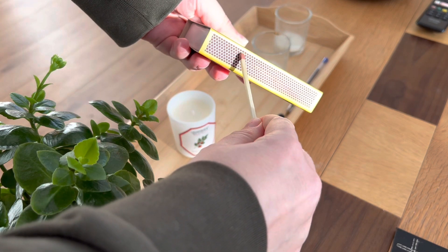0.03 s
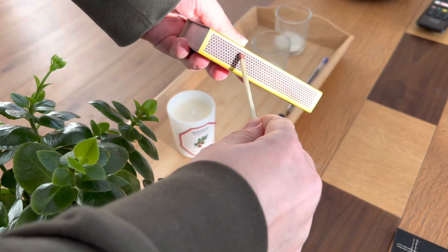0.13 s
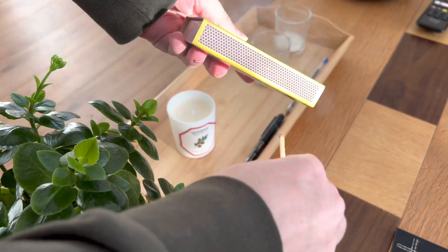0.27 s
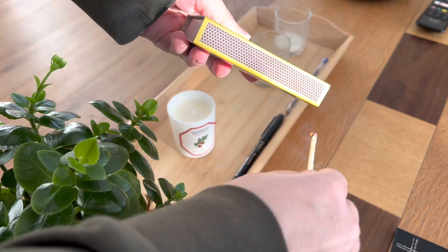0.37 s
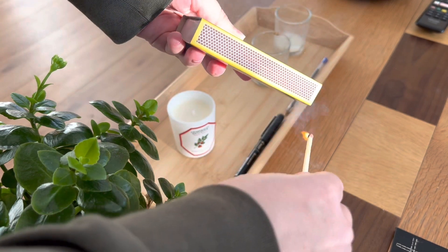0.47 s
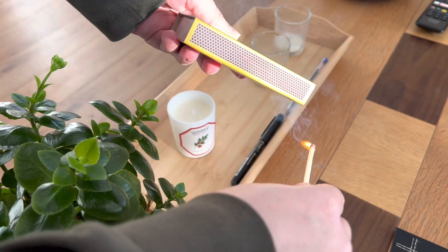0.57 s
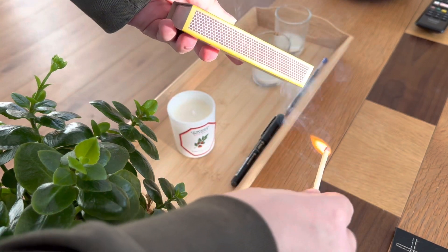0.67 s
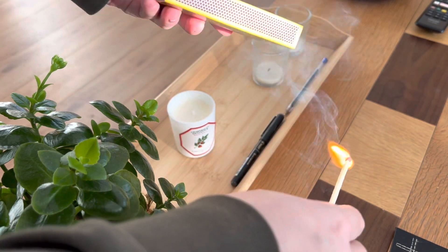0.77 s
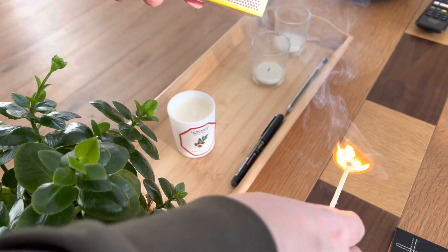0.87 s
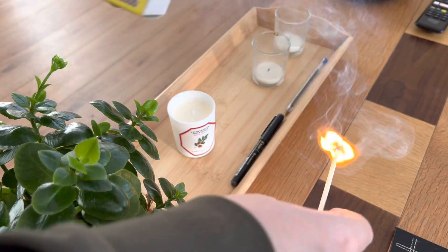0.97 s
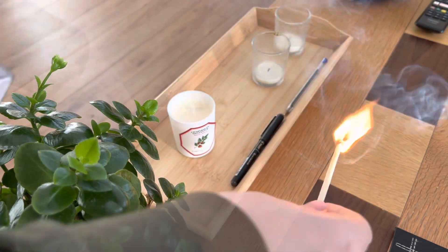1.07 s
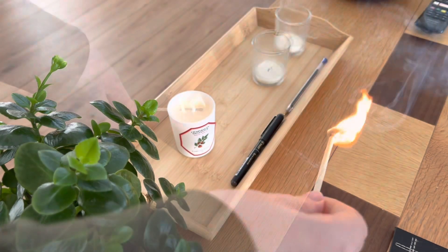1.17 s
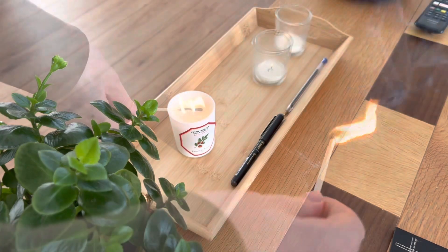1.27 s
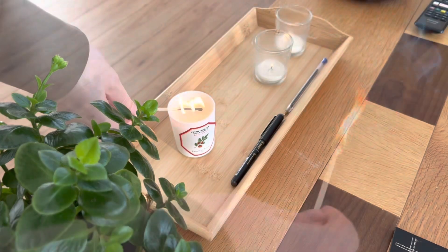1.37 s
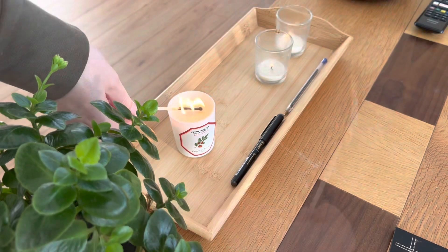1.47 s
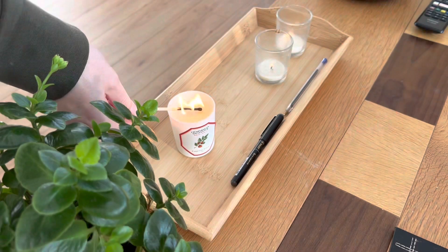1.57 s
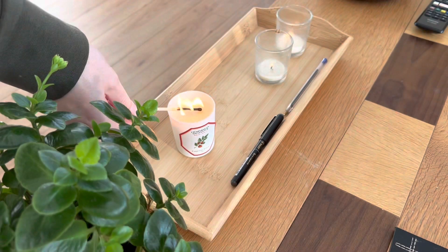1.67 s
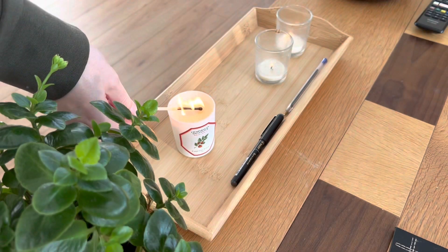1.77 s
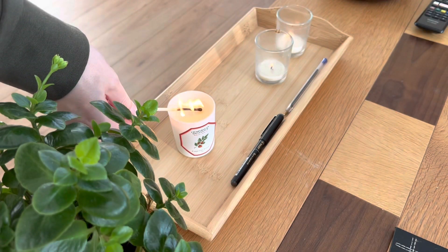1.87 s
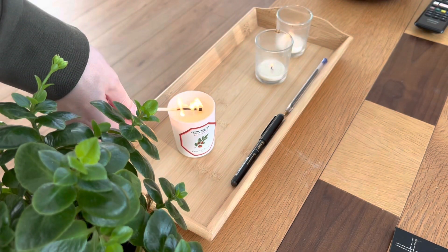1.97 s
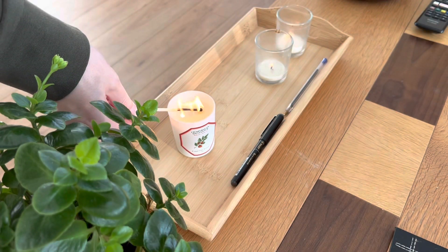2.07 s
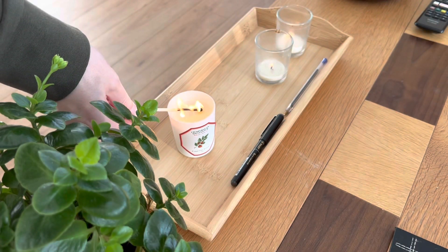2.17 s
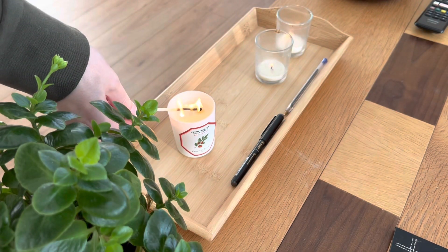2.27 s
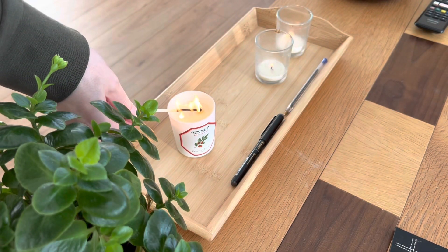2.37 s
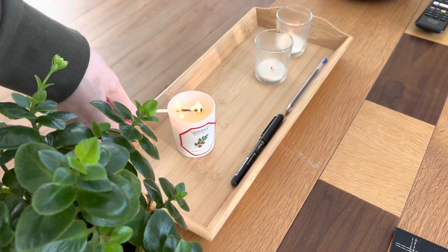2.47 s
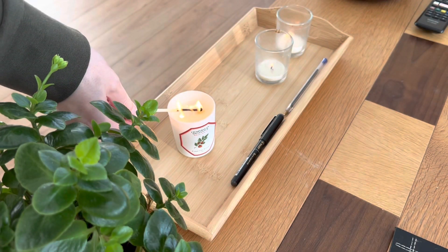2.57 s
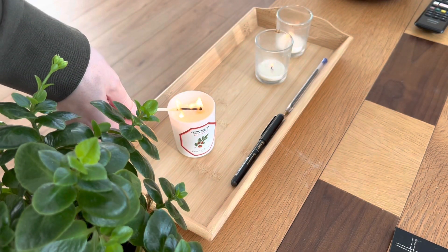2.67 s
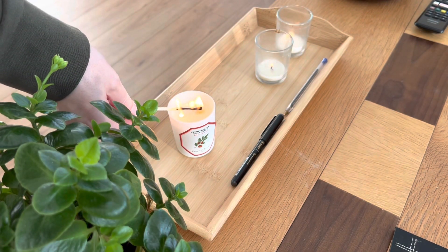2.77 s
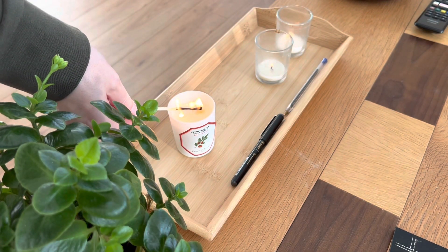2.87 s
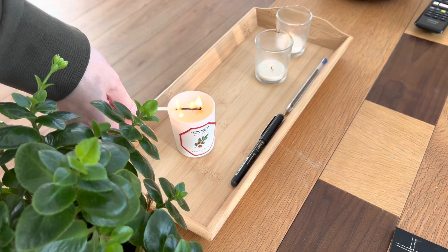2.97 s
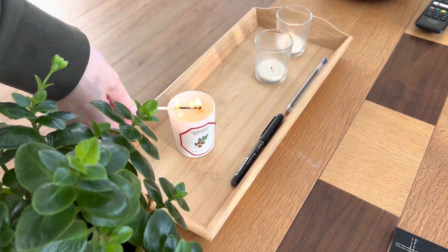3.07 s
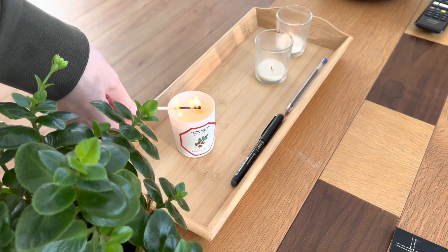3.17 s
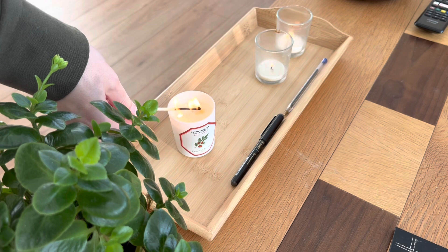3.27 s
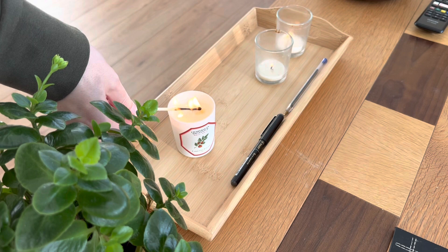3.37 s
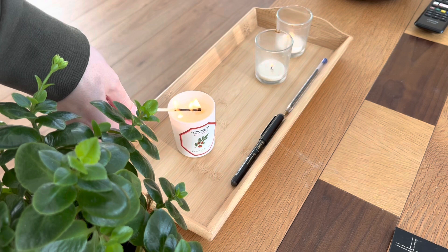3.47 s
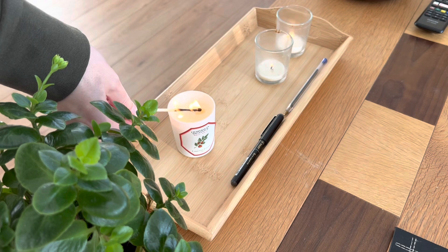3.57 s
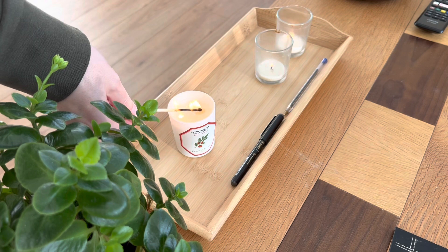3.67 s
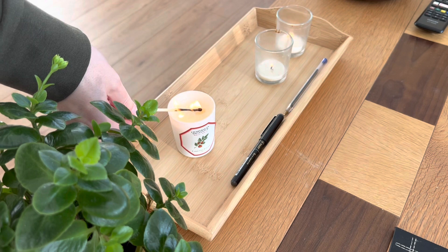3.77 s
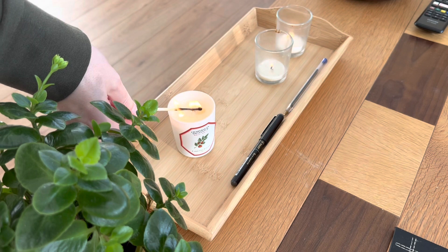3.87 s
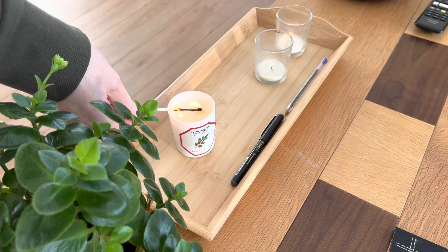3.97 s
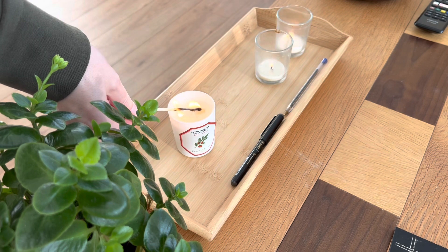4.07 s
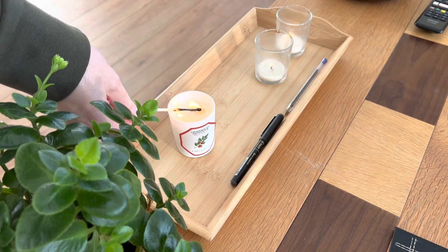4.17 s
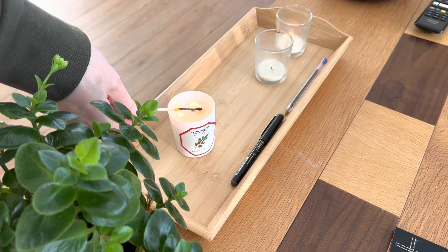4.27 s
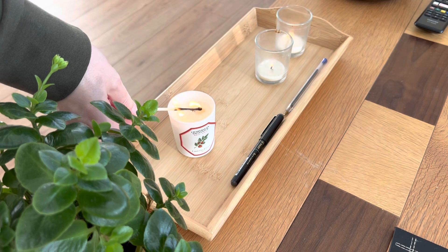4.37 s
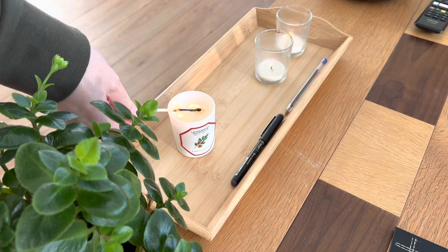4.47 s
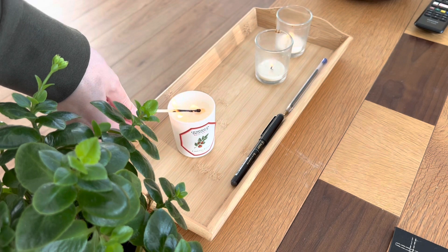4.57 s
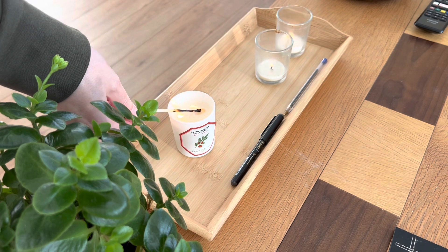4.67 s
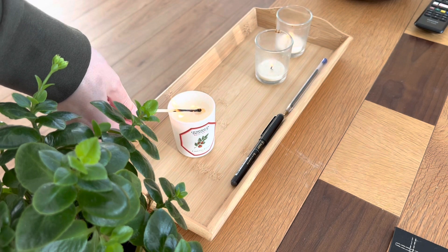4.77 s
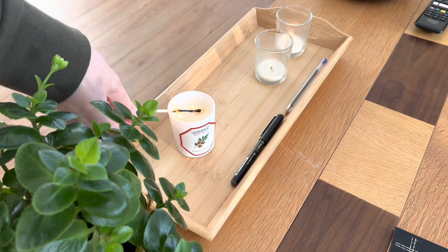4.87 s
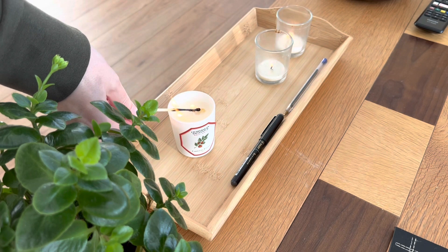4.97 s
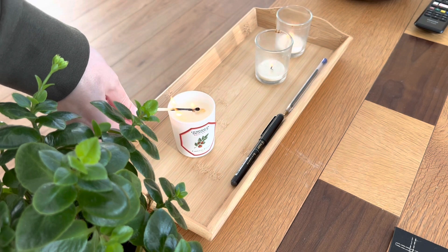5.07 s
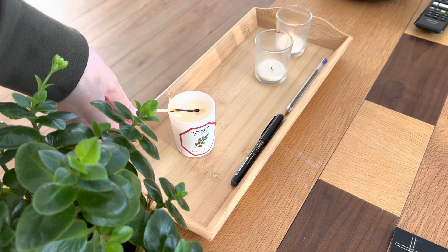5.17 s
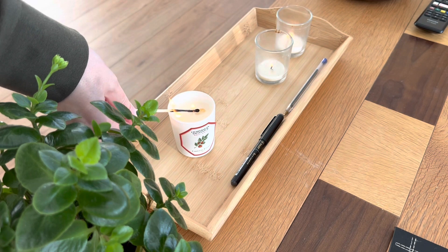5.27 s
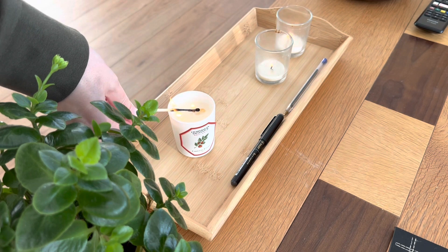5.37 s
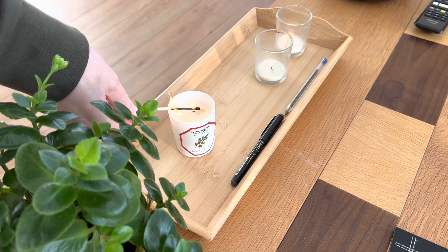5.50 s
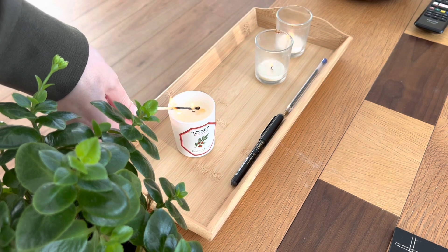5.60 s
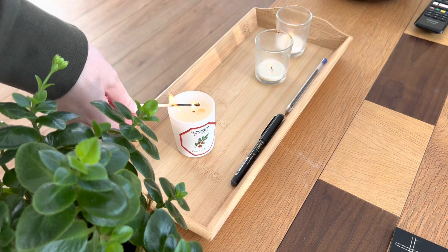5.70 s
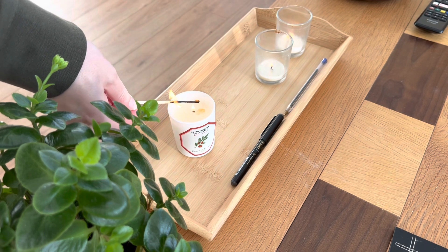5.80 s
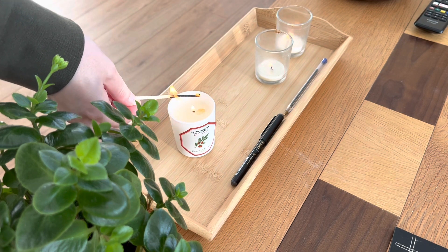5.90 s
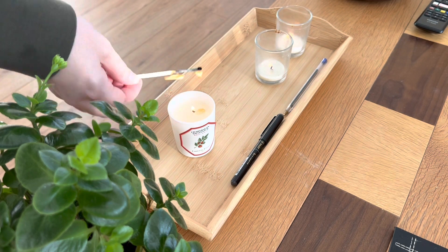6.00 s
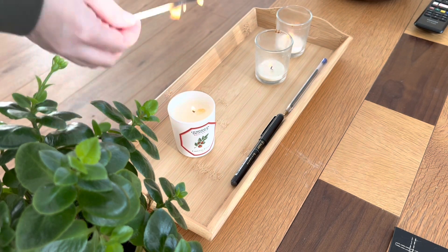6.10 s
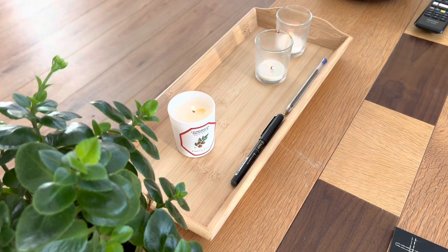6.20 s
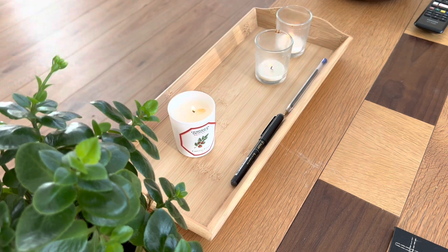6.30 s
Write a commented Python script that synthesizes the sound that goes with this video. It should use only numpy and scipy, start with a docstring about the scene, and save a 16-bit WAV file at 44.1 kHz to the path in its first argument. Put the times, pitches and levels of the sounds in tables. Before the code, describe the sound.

A wooden match is scraped once on a matchbox, flares with a fluttering hiss that stops short, then faint crackles tick in a quiet room.

```python
"""Small, quiet room, two closely spaced microphones: a low swelling rumble of noise lies under still air.
Close by, a wooden match is scraped once along a matchbox: grit and slips are impacts that ring the hollow box.
The head flares, a hiss of countless tiny grains over a low noise roar; it fades, surges and stops short.
Held to a candle in a glass, wood and wick then tick in damped pops and bursts, over a faint fizz of grains.
The fizz rises near the end as the match is drawn out; the room answers with a short tail of reflections."""
import sys
import numpy as np
from scipy import signal
from scipy.fft import rfft, irfft, next_fast_len
from scipy.io import wavfile
from scipy.ndimage import uniform_filter1d

SR = 44100
rng = np.random.default_rng(int(sys.argv[2]) if len(sys.argv) > 2 else 0)


def generate_wav(signal):
    """Clip the signal to [-1, 1] and save it as 16-bit WAV at the path in sys.argv[1]."""
    frames = np.transpose(np.atleast_2d(signal))
    scaled = np.clip(frames, -1, 1) * 32767
    pcm = np.round(scaled).astype(np.int16)
    wavfile.write(sys.argv[1], SR, pcm)


N = 279594
TIME, FREQS = np.arange(N) / SR, np.fft.rfftfreq(N, 1 / SR)  # s, Hz
CATCH_S, CUT_S = 0.28, 1.38  # the head takes fire, and the flare's sound is cut off


def amp(db):
    """Decibels to gain."""
    return 10 ** (np.asarray(db) / 20)


def unit(x):
    """Scales to an rms of one."""
    return x / np.sqrt(np.mean(x ** 2) + 1e-30)


def at_hz(points, hz):
    """Reads a table along a logarithmic frequency axis."""
    f, value = np.transpose(points)
    return np.interp(np.log(hz + 1), np.log(f + 1), value)


def colour(x, points):
    """Gives a sound a spectrum, at an rms of one."""
    return unit(irfft(rfft(x) * amp(at_hz(points, FREQS)), N))


def band_noise(low_hz, high_hz, length):
    """Noise between two frequencies."""
    sos = signal.butter(2, [low_hz, high_hz], "band", fs=SR, output="sos")
    return signal.sosfilt(sos, rng.standard_normal(length))


def add(mix, s, sound):
    """Lays a short sound into a track, starting at s seconds."""
    part = mix[max(round(s * SR), 0):][:len(sound)]
    part += sound[:len(part)]


def flutter(size):
    """Random wavering, smooth over this many samples."""
    return unit(uniform_filter1d(rng.standard_normal(N), size=size))


def grains(per_s, spread_db):
    """Random tiny impacts, mostly small, a few large."""
    size = amp(spread_db * np.minimum(rng.exponential(1, N), 3.5))
    hits = rng.choice([-1, 1], N) * (rng.random(N) < per_s / SR)
    return unit(size * hits)


def burst(decay_s):
    """A spike of noise that dies at once, with the energy of one millisecond at unit power."""
    t = TIME[:SR // 50]
    x = rng.choice([-1, 1], len(t)) * np.exp(-t / decay_s)
    return x * np.sqrt(SR / 1000) / np.linalg.norm(x)


def pop(hz, cycles):
    """A heavily damped ring that swells within its first cycle."""
    turns = hz * TIME[:SR // 20]
    return np.sin(2 * np.pi * turns) * np.exp(-turns / cycles) * (1 - np.exp(-2 * np.pi * turns))


# How alike the two microphones hear sound from all sides.
# Each row: frequency in Hz, left-right correlation.
LIKENESS = [(60, 0.94), (130, .92), (290, .7), (640, 0.39), (1400, .15), (7000, 0.078)]


def diffuse(two):
    """Sound from all sides: long waves are alike at both microphones, short ones are not."""
    size = next_fast_len(two.shape[1], True)
    a, b = rfft(two, size)
    same = np.clip(at_hz(LIKENESS, np.fft.rfftfreq(size, 1 / SR)), 0, 1)
    right = same * a + np.sqrt(1 - same ** 2) * b
    return irfft(np.array([a, right]), size)[:, :two.shape[1]]


# The direct path from a near source to the two microphone ports.
# Each row: frequency in Hz, lead of the left microphone in radians.
PORT_PHASE = [(20, 0), (300, 0.41), (1000, 0.65), (2000, 0.86), (2840, 0.85), (4700, 1.2), (5900, 7),
              (6600, 8), (7900, 7.5), (8600, 7.5), (10500, 9.5), (12300, 14), (14600, 13), (16400, 15)]


def pair(x, scatter_db=-12, scatter_s=0.0012):
    """A near source reaches the left microphone first; hands and table scatter it differently to each."""
    right = irfft(rfft(x) * np.exp(-1j * at_hz(PORT_PHASE, FREQS)), N)
    t = TIME[:SR // 100]
    taps = rng.standard_normal((2, len(t))) * t * np.exp(-t / scatter_s)
    taps = taps / np.linalg.norm(taps, axis=1, keepdims=True)
    scattered = signal.oaconvolve(x[None], taps, axes=1)[:, :N]
    return np.array([x, right]) + amp(scatter_db) * diffuse(scattered)


# How long the room rings. Each row: frequency in Hz, time to fall by 60 dB in s.
ROOM_T60 = [(100, .25), (400, 0.19), (1000, .42), (3000, 0.42), (7000, 0.35), (12000, .2), (16000, .16)]
# The tone of the room's reflections. Each row: frequency in Hz, relative level in dB.
ROOM_COLOUR = [(60, -8.5), (300, -4), (1000, 0.5), (2000, -2), (4000, 1), (6500, 1.5), (8500, -2),
               (10500, -6.5), (13000, -3), (16000, -6.5)]


def room(x, gap_s=0.0083):
    """Reflections from the walls: after a short gap, a tail whose length depends on frequency."""
    taps = rng.standard_normal((2, SR)) * (rng.random((2, SR)) < 5000 / SR) * (TIME[:SR] > gap_s)
    hz, t, z = signal.stft(taps, SR, nperseg=256)
    decay = np.exp(-np.log(1000) * t / at_hz(ROOM_T60, hz)[:, None])
    z = z * amp(at_hz(ROOM_COLOUR, hz))[:, None] * decay
    tail = diffuse(signal.istft(z, SR, nperseg=256)[1][:, :SR])
    return signal.fftconvolve(x[None], tail / np.linalg.norm(tail[0]), axes=1)[:, :N]


# The course of the room's low rumble, before its random swell and its lean to one side.
# Each row: time in seconds, level in dB.
RUMBLE = [(0, -71), (.45, -67), (1.35, -64), (1.85, -59), (2.17, -60.5), (2.3, -58), (2.75, -55),
          (3.35, -59.5), (3.7, -58), (4.2, -62.5), (5.0, -62.5), (5.22, -57), (5.42, -64), (5.8, -60),
          (6.3, -64)]
# The spectrum of the rumble. Each row: frequency in Hz, relative density in dB per Hz.
RUMBLE_COLOUR = [(15, -22.5), (30, -14), (48, -9.5), (58, -1.5), (65, 4.5), (74, -1.5), (100, -6),
                 (135, -17.5), (200, -20), (300, -36), (600, -38.5), (1500, -67.5)]
# The spectrum of the still air. Each row: frequency in Hz, relative density in dB per Hz.
AIR_COLOUR = [(30, 2), (200, 9.5), (500, 0.5), (1000, -1), (2500, -8), (4500, -11), (7000, -15),
              (10000, -28), (13000, -18), (16000, -28)]


def background(air_db=-79, swell_db=2, lean_db=0.52):
    """Diffuse noise: a slowly swelling rumble, a little to the right, under the still air of the room."""
    rumble = colour(diffuse(rng.standard_normal((2, N))), RUMBLE_COLOUR)
    rumble = rumble * amp([[-lean_db], [lean_db]])
    air = colour(diffuse(rng.standard_normal((2, N))), AIR_COLOUR)
    level_db = np.interp(TIME, *np.transpose(RUMBLE)) + swell_db * flutter(size=5000)
    return amp(level_db) * rumble + amp(air_db) * air


# Fresh parts of the head taking fire.
# Each row: centre in seconds, half length in seconds, lift in dB before the surge factor.
SURGES = [(1.023, 0.114, 6.5), (1.254, 0.068, 5.5)]


def blaze(fade_db_per_s, rise_s, surge=1, stop_s=0.025, catch_db=-46.5):
    """How loud the burning head is: it catches, fades steadily in dB, surges, and stops short."""
    t = TIME[TIME < CUT_S]
    lift_db = surge * sum(db * np.exp(-((t - s) / half_s) ** 2) for s, half_s, db in SURGES)
    alight = np.clip((t - CATCH_S) / rise_s, 0, 1) * np.clip((CUT_S - t) / stop_s, 0, 1)
    level = alight * amp(catch_db - fade_db_per_s * (t - CATCH_S) + lift_db)
    return np.pad(level, (0, N - len(t)))


# The spectrum of the flame's fizz. Each row: frequency in Hz, relative density in dB per Hz.
FIZZ_COLOUR = [(300, -4.5), (1500, -4.5), (2600, -4.5), (4500, -17.5), (8500, -12.5), (10300, -21),
               (11600, -2), (12700, 3), (14000, -0.5), (15300, -2.5), (16200, -14)]


def fizz(head_db=-4, fade_db_per_s=30, surge=1.86, steady_db=-83, draw_out_s=6.05, draw_out_db_per_s=22):
    """The flame sizzles in fine grains: strongly with the flare, then faintly, rising as it leaves the glass."""
    steady_level_db = steady_db + draw_out_db_per_s * np.maximum(TIME - draw_out_s, 0)
    steady = amp(steady_level_db) * (TIME > CATCH_S)
    level = amp(head_db) * blaze(fade_db_per_s, rise_s=0.04, surge=surge) + steady
    return level * colour(grains(per_s=7000, spread_db=4.5), FIZZ_COLOUR)


def glass(x, cluster_db=-36, cluster_s=0.0086, ring_db=-47, ring_t60_s=0.33, waver=0.6):
    """After the flare's hiss stops short, the candle glass's air rings: a wavering band over a short cluster."""
    t = TIME[:SR // 2]
    ring = band_noise(1370, 1510, len(t))
    cluster = band_noise(950, 1550, len(t))
    # waver: 0 steady, 1 fully random in strength
    ring = unit(ring * abs(signal.hilbert(ring)) ** (waver - 1))
    long_ring = amp(ring_db) * ring * np.exp(-np.log(1000) * t / ring_t60_s)
    short_rings = amp(cluster_db) * unit(cluster) * np.exp(-t / cluster_s)
    return signal.oaconvolve(x * (TIME > CUT_S), long_ring + short_rings)[:N]


def faint_crackles(typical_db=(-81, -77, -74), spread_db=2.5, per_s=3):
    """Small cracks at random moments after the flare's hiss stops short, with the loud ones' columns."""
    draws = rng.standard_normal((60, 3))
    times = CUT_S + (np.arange(len(draws)) + rng.random(len(draws))) / per_s
    rows = np.column_stack([times, np.array(typical_db) + spread_db * np.clip(draws, -2, 2)])
    return rows[times < TIME[-1]]


# The loudest cracks of wood and wick. Each row: start in seconds,
# then relative levels in dB of the hollow pop, the woody crack and the bright snap.
CRACKLES = [(0.908, -35, -50.5, -59), (0.962, -38.5, -40.5, -57), (1.594, -78, -73, -78),
            (1.72, -79, -67, -72), (2.118, -67, -69, -82), (2.469, -60.5, -67.5, -62),
            (2.524, -64, -68, -65), (2.629, -62, -85, -74), (3.041, -79, -67, -78),
            (3.197, -52.5, -60.5, -51.5), (3.27, -63, -60, -77), (3.28, -61, -75.5, -69),
            (3.565, -85, -64, -63), (3.637, -73, -60, -89), (3.733, -62, -69, -66),
            (3.886, -67, -66.5, -78), (3.908, -85, -49.5, -60.5), (4.064, -67, -69, -69),
            (4.116, -72, -69, -71), (4.474, -76, -52, -49.5), (4.608, -62, -75, -66),
            (4.796, -64, -67, -61.5), (4.977, -78, -70.5, -88), (5.07, -65, -69.5, -89),
            (5.403, -79, -68.5, -76), (5.501, -80, -70, -67), (5.592, -62.5, -65.5, -64),
            (6.301, -80, -86, -60)]
# Soft puffs of the flame. Each row: start in seconds, relative level in dB, pitch in Hz.
PUFFS = [(3.056, -58, 353), (3.086, -54, 320), (3.282, -57, 455), (4.477, -43.5, 203), (4.797, -58, 450),
         (5.072, -51.5, 480), (5.529, -57.5, 325)]


def crackles(pop_db=4, crack_db=8, snap_db=4, puff_db=2, splinter_db=-8.5, splinter_s=0.0024):
    """Pockets of gas burst: a snap, a short woody crack that splinters, and a pop that rings the glass."""
    pop_hz, crack_hz, ring_cycles, size_spread = 1264, 2180, 1.11, 0.074
    pops, cracks, snaps, splinters = np.zeros((4, N))
    for s, hollow_db, woody_db, bright_db in np.vstack([CRACKLES, faint_crackles()]):
        pitch = np.exp(size_spread * rng.standard_normal())
        add(pops, s, amp(hollow_db + pop_db) * pop(pop_hz * pitch, ring_cycles))
        add(cracks, s, amp(woody_db + crack_db) * pop(crack_hz * pitch, cycles=1.0))
        add(splinters, s, amp(woody_db + crack_db + splinter_db) * burst(splinter_s))
        # one millisecond's energy in a single spike
        add(snaps, s, [amp(bright_db + snap_db) * np.sqrt(SR / 1000)])
    for s, db, hz in PUFFS:
        add(cracks, s, amp(db + puff_db) * pop(hz, cycles=0.75))
    # both colours: (Hz, relative dB)
    snap_colour = [(1000, -22), (4000, 0.0), (8300, -6), (10200, -15), (12300, 8.0), (16000, 3)]
    splinter_colour = [(200, -3), (1000, -1.5), (2000, 2.5), (3400, 1.5),
                       (4800, -11.5), (8500, -10), (16000, -26)]
    snaps = np.std(snaps) * colour(snaps, snap_colour)
    splinters = np.std(splinters) * colour(splinters, splinter_colour)
    return pops + glass(pops) + cracks + snaps + splinters


def patchy(x, depth_db):
    """Lets patches of the spectrum, some hundred hertz wide, come and go."""
    z = signal.stft(x, nperseg=256)[2]
    across_hz = uniform_filter1d(rng.standard_normal(z.shape), size=4, axis=0)
    patches = unit(uniform_filter1d(across_hz, size=12, axis=1))
    return unit(signal.istft(z * amp(depth_db * patches), nperseg=256)[1][:N])


# The spectrum of the gas jets. Each row: frequency in Hz, relative density in dB per Hz.
FLARE_HISS = [(100, 3.5), (300, -2), (650, -8), (1150, 3), (1750, -4), (2300, 6), (3050, -1), (3700, 4.5),
              (6000, -2.5), (8200, 4.5), (10200, -20.5), (11900, 7.5), (14000, -5), (16000, -7)]


def flare(hiss_db=-1, body_db=-5, split_hz=2000, flutter_db=2.0, sputter_db=2.5, fade_db_per_s=24,
          room_db=-3, roar_db=-17, roar_hz=400, roar_fade_db_per_s=11):
    """Gas bursts from the head in tiny jets: a fluttering hiss, a sputtering rush and the flame's low roar."""
    jets = patchy(colour(grains(per_s=7000, spread_db=4.0), FLARE_HISS), depth_db=3.0)
    rush = signal.sosfiltfilt(signal.butter(3, split_hz, fs=SR, output="sos"), jets)
    hiss = amp(hiss_db + flutter_db * flutter(size=450)) * unit(jets - rush)
    body = amp(body_db + sputter_db * flutter(size=800)) * unit(rush)
    roar = amp(roar_db) * unit(band_noise(100, roar_hz, N))
    burn = (hiss + body) * blaze(fade_db_per_s, rise_s=0.15)
    burn = burn + roar * blaze(roar_fade_db_per_s, rise_s=0.03)
    ending = np.clip((CUT_S - TIME) / 0.028, 0, 1)  # the flare's reflections stop short with it
    return pair(burn) + amp(room_db) * room(burn) * ending


# The box pressed and let go, thudding in the hand.
# Each row: start in seconds, level in dB, pitch in Hz.
THUDS = [(0.2485, -28, 340), (0.2556, -25, 178.2), (0.2613, -22.5, 165.1)]


def thuds():
    """The whole box gives under the heaviest part of the stroke: low, heavily damped pops."""
    out = np.zeros(N)
    for s, db, hz in THUDS:
        add(out, s, amp(db) * pop(hz, cycles=0.88))
    return out


# The modes of the hollow matchbox.
# Each row: frequency in Hz, width in Hz, relative level in dB before weighting by the width.
BOX = [(680, 100, -17), (940, 80, 0), (1010, 90, 2.5), (1110, 110, 1.5), (1290, 51, -1.5),
       (1970, 140, -2.5), (2560, 57, -6), (3000, 170, -13.5), (3760, 160, -12.5)]


def box(x, rise_s=0.0008):
    """The matchbox's modes swell over about a millisecond; a unit blow rings with a peak of one."""
    t = TIME[:SR // 10]
    ring = sum(amp(db) * width * np.exp(-np.pi * width * t) * np.sin(2 * np.pi * hz * t)
               for hz, width, db in BOX)
    ring = ring * (1 - np.exp(-t / rise_s))
    return signal.oaconvolve(x, ring / abs(ring).max())[:N]


def friction(touch_s=0.212, bite_s=0.231, leave_s=0.2655, touch_db=-54.5, grip_db=-24.5,
             grip_attack_s=0.01, speed_up_db_per_s=300, release_s=0.00056):
    """How hard the head rubs: faint touch, quick bite, swell as the hand speeds up, sudden release."""
    sliding = np.clip(TIME, bite_s, leave_s) - bite_s
    bite = np.minimum(sliding / grip_attack_s, 1)
    speed_up_db = speed_up_db_per_s * np.maximum(sliding - grip_attack_s, 0)
    level_db = touch_db + (grip_db - touch_db) * bite + speed_up_db
    release = np.exp(-np.maximum(TIME - leave_s, 0) / release_s)
    return amp(level_db) * (TIME > touch_s) * release


def stick(ring_db=-29, ring_hz=1240, upper_db=-39, upper_hz=2900, cycles=3.5):
    """Each catch of the head also twangs the matchstick, in two damped modes."""
    out = np.zeros(N)
    for s, _, _ in SLIPS:
        add(out, s, amp(ring_db) * pop(ring_hz, cycles) + amp(upper_db) * pop(upper_hz, cycles))
    return out


# The head catching and slipping, which also times the twangs of the stick.
# Each row: start in seconds, relative level of the bright snap in dB, relative push on the box in dB.
SLIPS = [(0.2143, -59.5, -30.5), (0.2205, -60.5, -34), (0.2333, -51, -30.5), (0.2371, -21.5, -24),
         (0.2442, -14.5, -22.5), (0.249, -14.5, -15.5), (.2522, -19, -20.5), (0.257, -10.5, -25),
         (.2610, -13, -16), (.2630, -20.5, -9.5), (0.2649, -13, -24)]
# The spectrum of grit on the striker. Each row: frequency in Hz, relative density in dB per Hz.
GRIT = [(40, -23.5), (130, -7), (600, 0.5), (1500, -8), (2300, -5), (2700, -1), (3900, -1.5), (5000, -3),
        (6500, -2.5), (9000, -1.5), (10200, -5), (12500, 3.5), (14500, -2), (16000, -11)]


def strike(grit_db=-2, snap_db=-2, rub_db=-25, slip_s=0.00072, recoil_db=-40, recoil_hz=68):
    """Grit and slips sound directly and shake the box, which recoils about when the head leaves it."""
    grit = friction() * grains(per_s=16000, spread_db=1)
    snaps, pushes, recoil = np.zeros((3, N))
    for s, bright_db, blow_db in SLIPS:
        add(snaps, s, amp(bright_db) * burst(slip_s))
        add(pushes, s, [amp(blow_db)])
    scrape = amp(grit_db) * grit + amp(snap_db) * snaps
    scrape = colour(scrape, GRIT) * np.std(scrape)
    swing = signal.windows.hann(round(0.085 * SR))
    add(recoil, 0.24, amp(recoil_db) * swing * np.sin(2 * np.pi * recoil_hz * TIME[:len(swing)]))
    return scrape + box(pushes + amp(rub_db) * grit) + recoil


def scene(strike_db=1, strike_room_db=-14, crackle_room_db=-8):
    """Room noise, strike, flare and flame; strike, flare and crackles each get a share of the room."""
    scrape = amp(strike_db) * strike() + stick() + thuds()
    ticks = crackles()
    wet = room(amp(strike_room_db) * scrape + amp(crackle_room_db) * ticks)
    return pair(scrape + ticks + fizz()) + flare() + wet + background()


def record(dry, edge_hz=16100):
    """The recorder's band limit: a steep low-pass."""
    lowpass = signal.firwin(401, edge_hz, window=("kaiser", 9), fs=SR)
    return signal.oaconvolve(dry, lowpass[None], "same", axes=1)


dry = scene()
out = record(dry)
generate_wav(out)
```